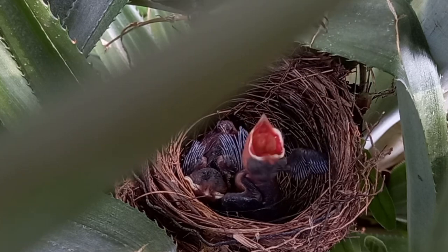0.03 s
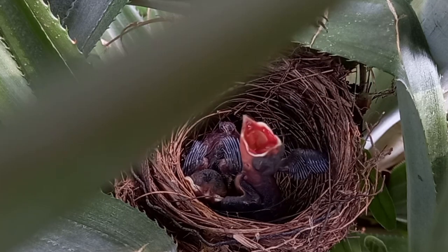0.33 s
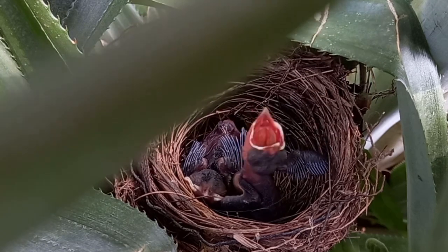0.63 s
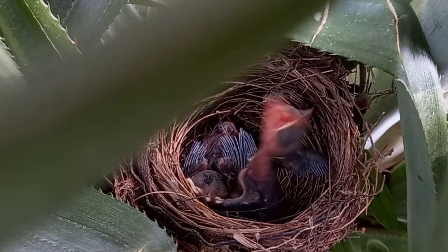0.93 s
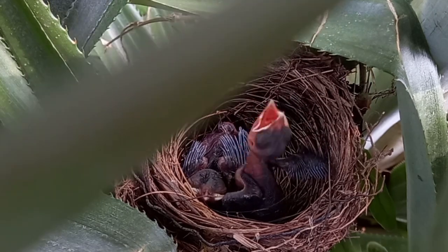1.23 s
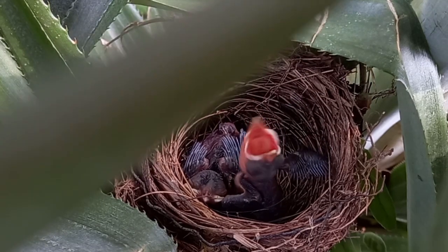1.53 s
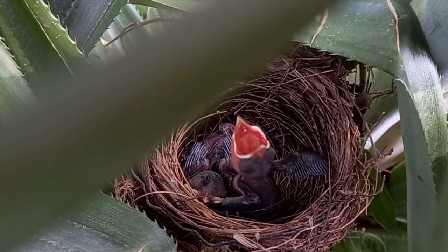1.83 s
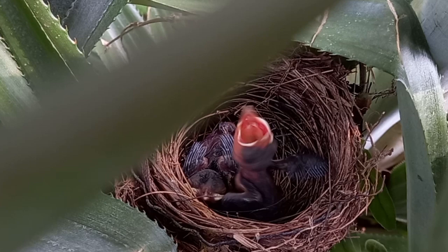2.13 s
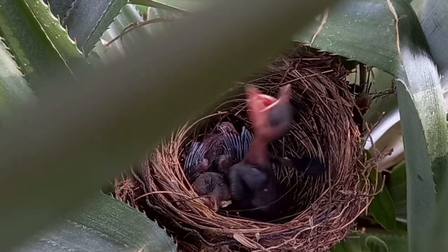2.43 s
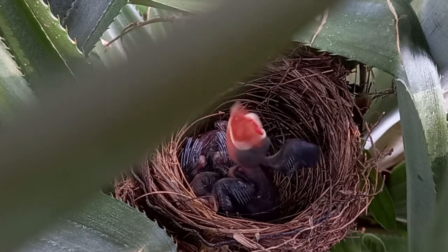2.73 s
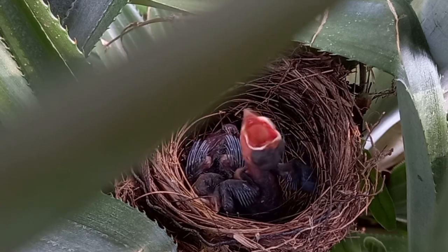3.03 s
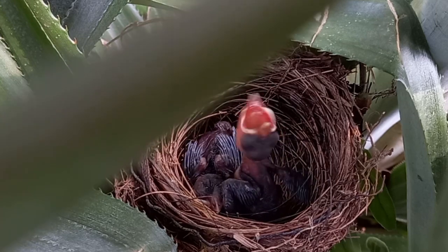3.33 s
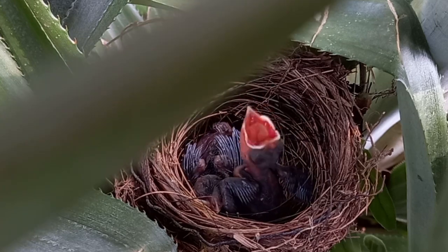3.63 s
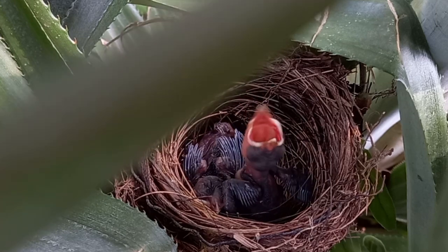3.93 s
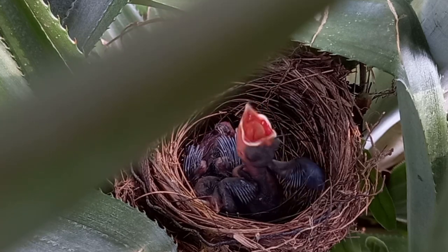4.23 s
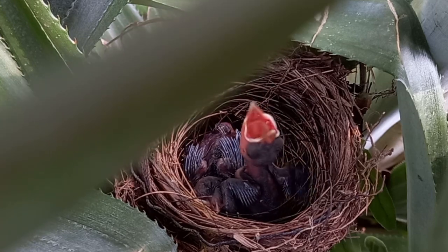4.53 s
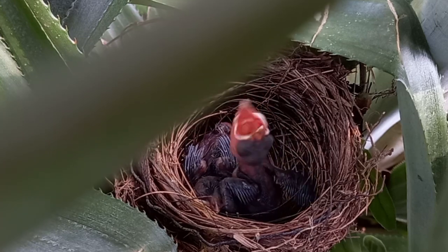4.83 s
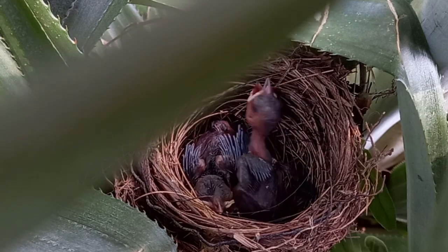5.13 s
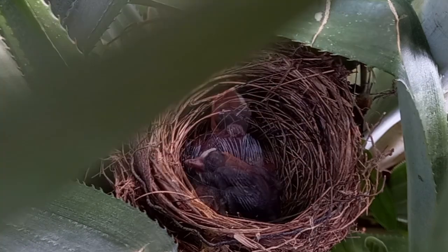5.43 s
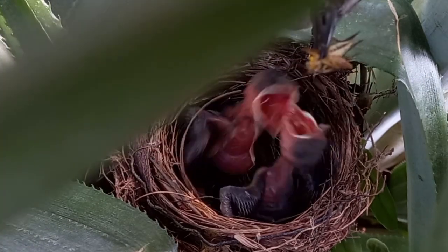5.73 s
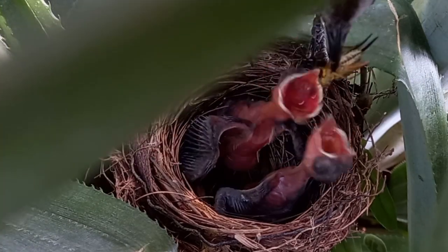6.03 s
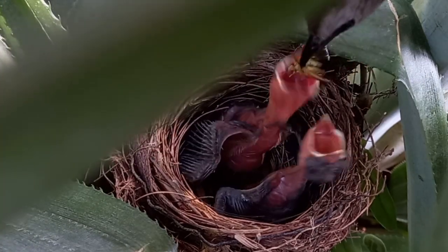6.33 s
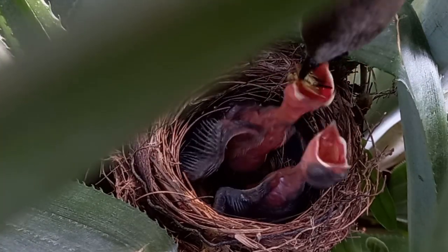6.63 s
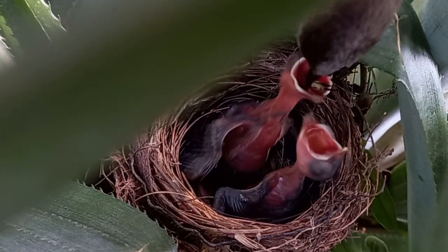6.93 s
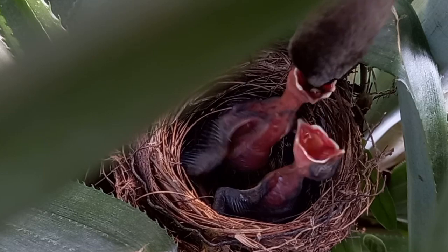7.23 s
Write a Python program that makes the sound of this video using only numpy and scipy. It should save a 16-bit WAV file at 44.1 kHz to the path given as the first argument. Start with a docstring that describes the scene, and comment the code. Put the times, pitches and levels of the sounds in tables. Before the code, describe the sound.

Outdoors, close to a nest in a leafy plant, insects buzz high and steady throughout over a low, gently swelling rumble. A very faint hum fades out after two seconds. Nestlings give short, high cheeps that begin as a rasp and clear into a rising whistle, at about 0.4, 1.1, 2, 2.5, 3.2, 4, 4.7 and 5.2 seconds, some trailed by tiny squeaks. Between 0.4 and 0.9 seconds, straw rustles, twigs crack and a quick cluster of soft, low thumps shakes the plant. Distant birds whistle faintly now and then, mostly from 2 to 4.5 seconds. Around 5.3 seconds comes a lighter bump, followed by small crackles and rustling. The chicks then switch to thin, level, slightly hoarse two-toned calls at about 5.7, 6.2, 6.7 and 7.2 seconds, ending with a couple of faint squeaks.

```python
"""Outdoors, close to a cup nest in a plant, chicks beg: each cheep starts as a rasp and clears into a
rising whistle, made by the syrinx, a bird's voice box. At feeding time the calls turn level and thin,
two tones at once. Soft bumps set the plant ringing low, twigs crack and straw rustles. Two bush insects
buzz steadily with their wings, other birds whistle far off, and a low rumble and a faint hum lie below."""
import sys
import numpy as np
from scipy import signal
from scipy.fft import rfft, irfft, next_fast_len
from scipy.io import wavfile

SR = 44100
rng = np.random.default_rng(int(sys.argv[2]) if len(sys.argv) > 2 else 0)


def transcribe(signal):
    """Save signal, clipped to [-1, 1], as a 16-bit WAV file at the path in sys.argv[1]."""
    frames = np.atleast_2d(signal).T
    limited = np.clip(frames, -1, 1)
    pcm = np.round(limited * 32767).astype(np.int16)
    wavfile.write(sys.argv[1], SR, pcm)


N = 326340
T = np.arange(N) / SR


def undb(db):
    """Turn decibels into a number to multiply by."""
    return 10 ** (np.asarray(db) / 20)


def unit(x):
    """Scale to an average strength (rms) of 1."""
    return x / np.sqrt(np.mean(x ** 2) + 1e-18)


def colour(x, points):
    """Make some pitches louder and others softer, along a curve of (Hz, dB) points."""
    hz, db = np.transpose(points)
    size = next_fast_len(x.shape[-1])
    f = np.arange(size // 2 + 1) * SR / size
    gain = undb(np.interp(np.log(f + 1), np.log(hz), db))
    return irfft(rfft(x, size) * gain, size)[..., :x.shape[-1]]


def noise(points):
    """Noise of strength 1, shaped by (Hz, dB) points."""
    return unit(colour(rng.standard_normal(N), points))


def walk(rate):
    """A smooth random wobble of strength 1 that changes about `rate` times a second."""
    f = np.arange(0, 4 * rate, SR / N)
    real, imaginary = rng.standard_normal((N // 16, 2))[:len(f)].T
    return unit(irfft((real + 1j * imaginary) * np.exp(-(f[:len(real)] / rate) ** 2), N))


def cycles(hz):
    """Count the vibrations completed so far as the rate changes."""
    return np.cumsum(hz) / SR


def pan(db):
    """Left and right gains that make the left louder by `db`."""
    return undb(np.array([[db], [-db]]) / 2)


def ramp(t, length):
    """Straight rise from 0 to 1 over a length of time."""
    return np.clip(t / length, 0, 1)


def ease(t, length):
    """Rounded rise from 0 to 1 over a length of time."""
    return np.sin(np.pi / 2 * ramp(t, length)) ** 2


def hump(x, centre, width):
    """A bell shape of height 1."""
    return np.exp(-((x - centre) / width) ** 2)


def span(start, length, edge_s=.0052):
    """The samples a call covers, the time since its start, and a gate that fades it in and out."""
    i = np.flatnonzero((T > start - edge_s) & (T < start + length + edge_s))
    t = T[i] - start
    return i, np.clip(t, 0, length), np.clip(np.minimum(t, length - t) / edge_s + 1, 0, 1)


def leaf_echoes(x, t60):
    """Echoes off leaves, different left and right. The fade time t60 is the seconds to fall 60 dB."""
    t = T[:SR]
    tail = rng.standard_normal((2, SR)) * undb(-60 * t / t60) * (t > .001)
    tail /= np.sqrt(np.sum(tail ** 2, axis=1, keepdims=True))
    return signal.fftconvolve(np.atleast_2d(x), tail, axes=1)[:, :N]


def outdoor_air():
    """A far rumble that swells, much alike in both ears, under a thin hiss from all around."""
    # The tone of the open air. Each row: frequency in Hz, level in dB.
    air_tone = [(25, -10), (40, -36), (55, -8), (85, -0.5), (120, 1.5), (170, -6), (235, -5.5), (320, -13),
                (500, -17.5), (1000, -22), (2500, -28), (5000, -30), (8000, -33.5), (10000, -45.5),
                (16000, -43)]
    # Swells of the rumble. Each row: peak time in seconds, width in seconds, rise in dB.
    surges = [(2.85, .2, 4), (3.37, .06, 7), (5.8, .1, 7), (6.37, .27, 9), (7.2, .5, 3.5)]
    shared = colour(noise(air_tone), [(100, .5), (300, -1.5), (700, -7.5), (1500, -14)])
    apart = np.array([noise(air_tone), noise(air_tone)])
    air = unit(shared + colour(apart, [(100, -2.5), (300, 1), (700, .5), (1500, 1)]))
    rumble = colour(air, [(250, -7), (600, -65)])
    rumble_db = -39.5 + walk(4.5) + sum(rise * hump(T, at, width) for at, width, rise in surges)
    hiss_db = -37 + .5 * walk(4.5)
    return pan(2.47) * (rumble * undb(rumble_db) + (air - rumble) * undb(hiss_db))


def far_hum(pitch_hz=597):
    """A faint, wavering tone from far off that fades after two seconds."""
    phase = 2 * np.pi * cycles(pitch_hz * (1 + .0203 * walk(18.4)))
    db = np.interp(T, [0, 2, 2.6], [-63, -64, -80]) + 5.8 * walk(13)
    return undb(db) * np.sqrt(2) * np.sin(phase)


def glides(rows):
    """Notes that swell and fade along one arc of pitch."""
    for start, length, from_hz, to_hz, arch_hz, *voice in rows:
        i, t, _ = span(start, length)
        arc = np.sin(np.pi * t / length)
        hz = from_hz + (to_hz - from_hz) * t / length + arch_hz * arc
        yield (i, arc, hz, *voice)


def whistles(notes, jitter, jitter_hz, flutter_db, octave_db):
    """Nearly pure tones that waver a little in pitch (jitter) and loudness (flutter)."""
    out, shake, flutter = np.zeros(N), walk(jitter_hz), walk(47)
    for i, gate, hz, db in notes:
        phase = 2 * np.pi * cycles(hz * (1 + jitter * shake[i]))
        tone = np.sqrt(2) * (np.sin(phase) + undb(octave_db) * np.sin(2 * phase))
        out[i] += gate * undb(db + flutter_db * flutter[i]) * tone
    return out


def far_birds():
    """Distant birds whistle, and the leaves add about as much echo as direct sound."""
    # Each row: start and length in seconds, first pitch, last pitch and mid-note bend in Hz,
    # relative level in dB.
    notes = [(1.78, 0.31, 4800, 4940, 24, -47.5), (2.96, .23, 4820, 4930, -62, -46),
             (3.765, .15, 3963, 3950, -50, -42), (3.803, .045, 1400, 1630, 3, -42),
             (3.846, 0.025, 2100, 2030, 0, -38), (4.2, .18, 4930, 4850, -48, -49),
             (4.285, 0.13, 3320, 3880, 61, -45), (6.5, .25, 3030, 2960, 10.5, -41)]
    song = whistles(glides(notes), jitter=.012, jitter_hz=260, flutter_db=1, octave_db=-30)
    return undb(-10) * song + undb(-9) * leaf_echoes(song, t60=.3)


def wing_strokes(wings, rate_hz, strokes, sweep_s, sweep_hz, rasp_db):
    """Each wing cycle holds a few strokes (place in the cycle, dB); each slows, so its pitch falls."""
    turn = cycles(rate_hz * (1 + .01 * walk(2.84)))
    clicks = np.zeros(N)
    for at, db in strokes:
        i = np.flatnonzero(np.diff(np.floor(turn - at)))
        late, extra_db = rng.standard_normal((len(i), 2)).T
        clicks[np.clip(i + (late * .0003 * SR).astype(int), 0, N - 1)] += undb(db + extra_db)
    f = np.arange(N // 2 + 1) * SR / N
    # Making the low pitches arrive later stretches each click into a falling glide.
    stretch = np.exp(1j * np.pi * sweep_s / sweep_hz * (f - 7500) ** 2)
    glide = unit(irfft(rfft(clicks) * stretch, N))
    return unit(colour(glide + undb(rasp_db) * rng.standard_normal(N), wings))


def insects():
    """A slow chirper ahead and a faster buzzer on the left; leaves blur their strokes."""
    # How each insect's wings ring. Each row: frequency in Hz, level in dB.
    chirper_wings = [(5700, -28.5), (6250, -20), (6600, -6), (6950, -2), (7450, -1.5), (7900, -43),
                     (8400, -44), (8800, -45), (12000, -27.5), (13000, -17.5), (13900, -6.8), (14800, -3.8),
                     (15150, -48), (16000, -11.5)]
    buzzer_wings = [(6200, -53), (6900, -8.5), (7400, -7.5), (7900, -5), (8250, -7.5), (8600, -32.5),
                    (9300, -81), (13000, -36), (14400, -22), (15700, -24)]
    chirper = wing_strokes(chirper_wings, rate_hz=19.2, strokes=[(0, -3), (.27, 0), (.6, -1)],
                           sweep_s=.003, sweep_hz=1300, rasp_db=-7)
    buzzer = wing_strokes(buzzer_wings, rate_hz=30.1, strokes=[(0, 0), (.28, -1)],
                          sweep_s=.005, sweep_hz=1100, rasp_db=-8)
    blurred = leaf_echoes(chirper, t60=.018)
    chirper = unit(blurred + colour(leaf_echoes(chirper, t60=.3), [(7000, 5), (14000, -1.5)]))
    buzzer = unit(buzzer + colour(leaf_echoes(buzzer, t60=.12), [(8000, 0), (14000, 5)]))
    return undb(-35.5 + .19 * walk(2.3)) * pan(.62) * chirper + undb(-46) * pan(18.7) * buzzer


def straw_rustle():
    """The chicks stir in the straw: each movement is a grainy noise that builds up and dies away."""
    # The tone of straw. Each row: frequency in Hz, level in dB.
    straw_tone = [(200, 5), (600, 5), (1500, 0), (4500, -2.5), (9000, -13), (14000, -2)]
    # Each row: peak time in seconds, level in dB, build-up and fade time in seconds.
    stirs = [(0, -37, .05, 0.81), (.44, -34.5, .08, 1.1), (.58, -34, 0.098, 1.75), (5.62, -37.5, 0.055, .5),
             (5.85, -48, .3, 2.8)]
    grains = rng.standard_normal((2, N)) * undb(.86 * walk(370) + 3.7 * walk(28))
    power = sum((ease(T - at + build_s, build_s) * undb(db - 60 * np.maximum(T - at, 0) / t60)) ** 2
                for at, db, build_s, t60 in stirs)
    return unit(colour(grains, straw_tone)) * np.sqrt(power)


def twig_cracks():
    """Twigs and stiff leaves crack in short bursts of noise, dull or bright."""
    # Each row: start in seconds, relative level and relative treble in dB, fade time in seconds.
    cracks = [(0.392, -45, -3, 0.057), (0.439, -30, -10, 0.073), (0.481, -33, -7, 0.039),
              (0.512, -34, -12, 0.091), (0.544, -18.5, -14, 0.052), (0.55, -27, -12, 0.026),
              (0.631, -40, -24, 0.039), (0.658, -25.5, -18, 0.047), (0.71, -25, -18, 0.05),
              (0.862, -39, -11, 0.037), (5.034, -54, 8, 0.05), (5.357, -34.5, -20, 0.067),
              (5.442, -48, -8, 0.055), (5.457, -47, -3, 0.057), (5.545, -42, -14, 0.05),
              (5.586, -38, -16, 0.093), (5.614, -41, -16, 0.038), (5.676, -36.5, -11, 0.1),
              (5.72, -41.5, -6, 0.061), (6.948, -35, -12, 0.033)]
    # The dull body of a crack. Each row: frequency in Hz, level in dB.
    body_tone = [(150, 14.5), (400, 6.5), (900, 4), (1450, 5), (2200, 2), (3200, 3.5), (5500, 1),
                 (9000, -22)]
    snap_tone = [(3000, -46), (6000, -1), (11000, 9), (15000, 10)]
    body, snap = (np.array([noise(tone), noise(tone)]) + noise(tone) for tone in (body_tone, snap_tone))
    out = np.zeros((2, N))
    for start, db, treble_db, t60 in cracks:
        i = np.flatnonzero((T >= start) & (T < start + .5))
        t = T[i] - start
        burst = undb(db - .5 - 60 * t / t60) * (1 - np.exp(-t / .00086))
        out[:, i] += burst * (body[:, i] + undb(treble_db + 8) * snap[:, i])
    return out


def plant_bumps():
    """Soft blows set the plant and nest ringing low, tuned a little differently each time."""
    # Each row: start in seconds, relative level in dB, fade time in seconds.
    blows = [(0.541, -13.5, 0.13), (.586, -11, 0.088), (0.629, -19, 0.26), (0.794, -19, 0.072),
             (0.848, -18, 0.073), (0.91, -26, 0.13), (5.275, -26, 0.14), (5.331, -24.5, 0.11),
             (7.36, -38, 0.072)]
    # The plant's own tones. Each row: pitch in Hz, relative level in dB, multiple of the fade time.
    plant_tones = [(66.4, -25, 0.78), (87.5, 2, 1.1), (111.6, 4.5, 0.83), (159.6, -6.5, 1.8),
                   (223.7, -6, 1.86), (339, -8, 0.65)]
    out, detunes = np.zeros(N), 1 + .023 * rng.standard_normal((len(blows), len(plant_tones)))
    for (start, db, t60), detune in zip(blows, detunes):
        i = np.flatnonzero((T >= start) & (T < start + 1))
        t = T[i] - start
        ring = sum(undb(tone_db - 60 * t / (t60 * linger)) * np.sin(2 * np.pi * hz * tuning * t)
                   for (hz, tone_db, linger), tuning in zip(plant_tones, detune))
        out[i] += undb(db - 4.5) * ring * (1 - np.exp(-t / .004))
    return out * pan(2.7)


def syrinx(calls, throat, jitter, flutter_db, rasp_db, half_db, side_db, band_db, bright_db):
    """A voice box tone and its octave; roughness shakes it, adds side tones and breaks it into rasp."""
    out, shake, flutter, wander = np.zeros(N), walk(380), walk(260), walk(60)
    grain = unit(undb(2 * walk(380)))
    rasp = noise(throat)
    chaos = (walk(480) + 1j * walk(480)) / np.sqrt(2)
    dull = colour(rasp, [(6500, 4), (8500, -35)])
    for i, gate, hz, db, rough, octave_db in calls:
        rough = np.clip(rough, 0, 1)
        phase = 2 * np.pi * cycles(hz * (1 + jitter * (rough + .061) * shake[i]))
        octave = undb(octave_db)
        tone = np.sin(phase) + octave * np.sin(2 * phase)
        tone += undb(half_db) * np.sqrt(rough) * (np.sin(phase / 2) + 2 * np.sin(1.5 * phase))
        tone *= np.sqrt(2) * undb(flutter_db * np.sqrt(rough) * flutter[i])
        # The two sides of the syrinx beat together, adding tones above and below the main one.
        beat = 2 * np.pi * cycles(hz * (.2 + .04 * wander[i]))
        sides = np.sin(phase + beat) + .5 * np.sin(phase - beat) + octave * np.sin(2 * phase - beat)
        # Chaotic vibration smears the tone and its octave into bands of noise.
        bands = np.imag(chaos[i] * np.exp(1j * phase) + octave * np.conj(chaos[i]) * np.exp(2j * phase))
        # The breath is brighter when the octave is strong.
        breath = dull[i] + undb(bright_db + .6 * octave_db) * (rasp[i] - dull[i])
        scratch = undb(rasp_db) * breath + undb(band_db) * bands + undb(side_db) * sides
        share = rough ** 2.1
        out[i] += gate * undb(db) * (np.sqrt(1 - share) * tone + np.sqrt(share) * grain[i] * scratch)
    return out


def feeding_calls():
    """Level calls, hoarse early on, that sag past the middle; each has a second tone above it."""
    # Each row: start and length in seconds, relative level in dB, fade-in in seconds and in dB,
    # pitch in Hz, place of the sag (0-1), sag in Hz and in dB, final drop in Hz, added roughness (0-1),
    # gap up to the second tone in Hz, levels of that tone and of the octave in dB against the main tone.
    rows = [(5.717, .166, -21.5, .062, 16, 5590, .63, 300, 12, 140, .1, 1170, -6.5, -36),
            (6.162, .2, -28, .025, 9, 5660, .66, 230, -0.5, 0, .3, 720, -8, -23),
            (6.66, .262, -28, .085, 5, 5730, .73, 250, 2, 0, .62, 560, -3, -21),
            (7.172, .203, -25.5, .06, 12, 5315, .9, 10, 7, 480, .52, 800, -9, -28)]
    drop_s, release_s, release_db = .04, .022, 20
    calls, second_tones, waver = [], [], .006 * walk(40)
    for (start, length, level_db, attack_s, attack_db, pitch_hz, sag_at, sag_hz, sag_db, drop_hz,
         roughness, above_hz, second_db, octave_db) in rows:
        i, t, gate = span(start, length)
        progress, to_go = t / length, length - t
        sag = hump(progress, sag_at, width=.22)
        bend = sag_hz * sag + drop_hz * (1 - ramp(to_go, drop_s)) + pitch_hz * waver[i]
        db = level_db - attack_db * (1 - ramp(t, attack_s)) - release_db * (1 - ramp(to_go, release_s))
        rough = .06 + roughness * hump(progress, centre=.28, width=.24)
        calls.append((i, gate, pitch_hz - bend, db - sag_db * sag ** 2, rough, octave_db))
        # The second tone comes and goes, and only partly follows the bend in pitch.
        second_gate = gate * hump(progress, centre=.4, width=.3)
        second_tones.append((i, second_gate, pitch_hz + above_hz - .42 * bend, db + second_db))
    return calls, second_tones


def begging_calls():
    """Each cheep swells as a rasp, then clears and climbs; some lock into a brief warble on the way."""
    # Each row: start, length and swell time in seconds, swell depth and relative level in dB, low and
    # top pitch of the clear voice in Hz, climb and clearing time in seconds, roughness (0-1), octave dB.
    cheeps = [(.395, .235, .165, 18, -27, 4850, 5750, .08, .07, 0.98, -10),
              (1.085, .146, .125, 17, -22.5, 4200, 5800, .06, .095, .9, -28),
              (2.038, .178, .085, 18, -26.5, 4700, 6200, 0.089, .085, .95, -12),
              (2.505, .168, .05, 13, -25, 3850, 4800, .163, .1, .42, -7),
              (3.234, .192, .112, 13, -26.5, 4550, 6350, 0.09, .11, .88, -11),
              (3.998, .194, .1, 17, -26, 4300, 6260, 0.1, .085, .93, -11.5),
              (4.69, .18, .13, 15, -24, 4550, 5700, .05, .1, .92, -11),
              (5.177, .17, .075, 10, -31, 4050, 5200, 0.13, .11, .62, -8)]
    # Moments when the rasp becomes a warble. Each row: start and length in seconds, pitch and warble
    # depth in Hz, seconds per warble, level change in dB, octave level in dB.
    locks = [(1.14, 0.029, 4290, 410, 0.042, -11, -18), (3.304, 0.026, 4070, 807, 0.069, -6, 5),
             (4.075, 0.048, 4060, 443, .037, -4, 4), (4.8, .028, 4350, 700, .056, -1, -12),
             (5.277, .042, 4720, 290, .033, 1.5, -14)]
    quaver_hz, quaver_period_s, last_crest_s = 85, .036, .024  # these make the climb go in steps
    top_early_s, clear_early_s = .008, .018  # the climb and the clearing finish this long before the end
    release_s, release_db = .03, 20
    rasp_lift_hz, lock_roughness = 700, .3
    drift = 1 + .01195 * walk(45.6)
    for (start, length, swell_s, swell_db, level_db, low_hz, top_hz, climb_s, clearing_s,
         roughness, octave_db) in cheeps:
        i, t, gate = span(start, length)
        to_go = length - t
        hz = (low_hz + (top_hz - low_hz) * ease(climb_s + top_early_s - to_go, climb_s)) * drift[i]
        hz += quaver_hz * np.cos(2 * np.pi * (to_go - last_crest_s) / quaver_period_s)
        db = level_db - swell_db * (1 - ramp(t, swell_s)) - release_db * (1 - ramp(to_go, release_s)) ** 2
        rough = roughness * (.22 + .78 * ease(to_go - clear_early_s, clearing_s - clear_early_s))
        octave_db = octave_db - .007 * np.maximum(hz - 5000, 0)  # high notes lose their octave
        hz += rasp_lift_hz * rough ** 2  # a rough voice sits higher than a clear one
        for at, held_s, lock_hz, depth_hz, period_s, change_db, lock_octave_db in locks:
            since = T[i] - at
            locked = ease(np.minimum(since, held_s - since) + .002, .005)
            warble_hz = lock_hz + depth_hz * np.sin(np.pi * since / period_s) ** 2
            hz += locked * (warble_hz - hz)
            db += locked * change_db
            rough += locked * (lock_roughness - rough)
            octave_db += locked * (lock_octave_db - octave_db)
        yield i, gate, hz, db, rough, octave_db


def chicks(right_lag_s=.000148, squeak_octave_db=-24):
    """The chicks' voices reach the left side first; the right side is dull around 8 kHz."""
    # Breath through the throat and open beak. Each row: frequency in Hz, level in dB.
    begging_breath = [(1000, -42), (1500, -7), (1900, -10), (2300, -15), (2800, -2.5), (3500, -5),
                      (4300, -1.5), (5500, -2.5), (8300, 1), (9300, -1.5), (11000, -6), (12500, -14),
                      (15000, -34)]
    feeding_breath = [(1500, -48), (3000, -14), (4400, -19), (5100, -10), (5800, 5), (6400, 2.5),
                      (8000, -4), (9200, -25), (12700, -18), (15000, -32)]
    # Thin squeaks. Each row: start and length in seconds, first pitch, last pitch and mid-note bend
    # in Hz, relative level in dB, roughness (0-1).
    squeak_notes = [(.556, .028, 6300, 7400, 0, -29, .2), (.575, 0.16, 4930, 4620, 380, -37, .02),
                    (1.152, 0.02, 2850, 4200, 0, -32, .2), (3.335, .026, 5400, 7100, 0, -27, .25),
                    (3.345, 0.058, 4000, 5960, 0, -34, .35), (4.135, 0.059, 5000, 5150, 200, -36, .1),
                    (4.793, .038, 6040, 7370, 98, -27, .25), (5.19, 0.085, 3910, 4180, -2, -35, .25),
                    (7.328, 0.042, 3770, 4400, 100, -40, .2), (7.383, 0.046, 4500, 4840, 0, -36, .3)]
    level_calls, second_tones = feeding_calls()
    squeaks = [(*note, squeak_octave_db) for note in glides(squeak_notes)]
    voice = syrinx([*begging_calls(), *squeaks], begging_breath, jitter=.054, flutter_db=3, rasp_db=2,
                   half_db=-24.5, side_db=-4, band_db=-10.5, bright_db=4.5)
    voice += syrinx(level_calls, feeding_breath, jitter=.015, flutter_db=2.5, rasp_db=4,
                    half_db=-35, side_db=-12, band_db=4, bright_db=15)
    voice += whistles(second_tones, jitter=.0062, jitter_hz=200, flutter_db=3, octave_db=-16)
    left = colour(voice, [(2000, 1.5), (4400, .3), (5600, -1), (8200, 8), (11000, -.5), (14000, -16)])
    right = colour(np.roll(voice, round(right_lag_s * SR)),
                   [(2000, -13.5), (4400, -.2), (5600, 1.6), (7000, -20), (8200, -9.5), (11000, -9.5),
                    (14000, -17)])
    both = np.array([left, right])
    return both + undb(-9) * leaf_echoes(both, t60=.02) + undb(-30) * leaf_echoes(both, t60=.6)


def scene():
    """The nest, the plant and their surroundings, added together in stereo."""
    return (far_birds() + chicks() + insects() + plant_bumps() + twig_cracks() + straw_rustle()
            + outdoor_air() + far_hum())


def record(dry, bottom_hz=42, top_hz=15800):
    """A phone's microphone drops the deepest bass and the highest treble."""
    dry = signal.sosfilt(signal.butter(4, bottom_hz, "high", fs=SR, output="sos"), dry)
    return signal.sosfilt(signal.ellip(10, .2, 80, top_hz, fs=SR, output="sos"), dry)


dry = scene()
out = record(dry)
transcribe(out)
```